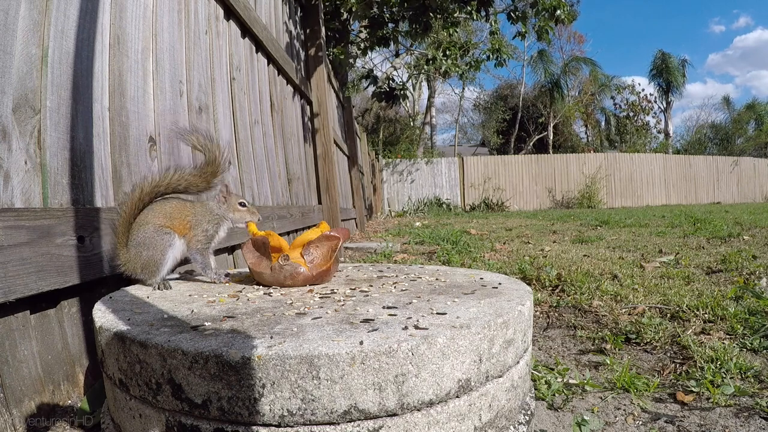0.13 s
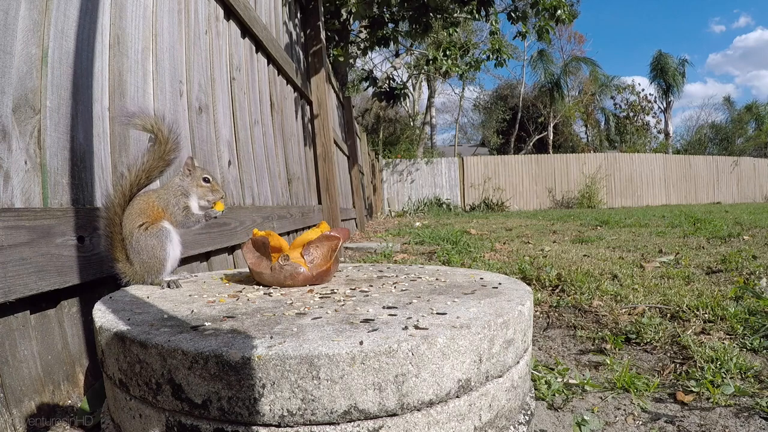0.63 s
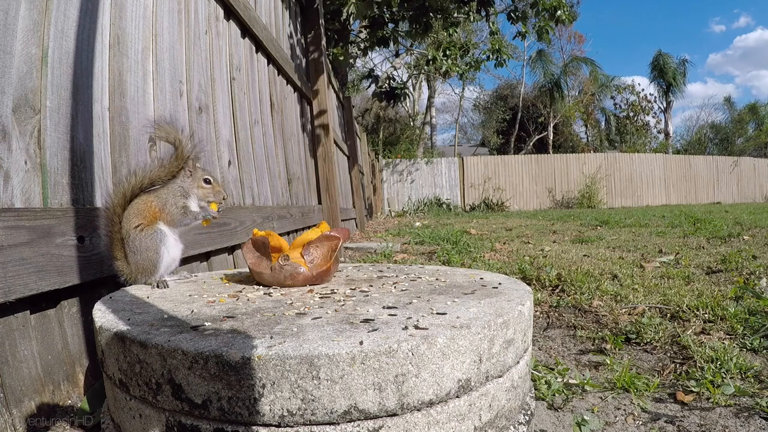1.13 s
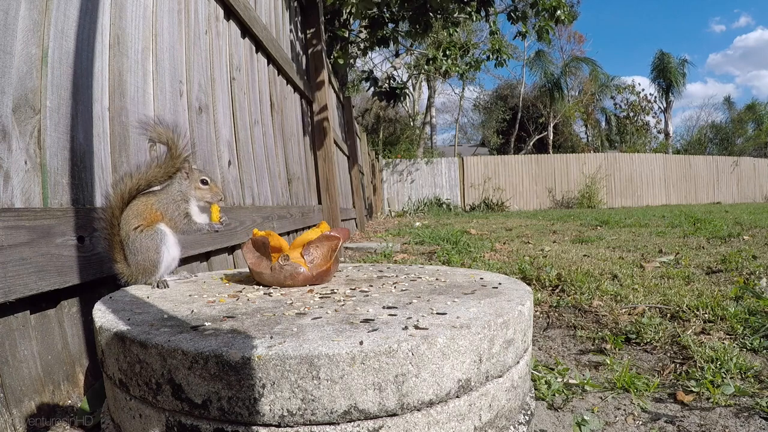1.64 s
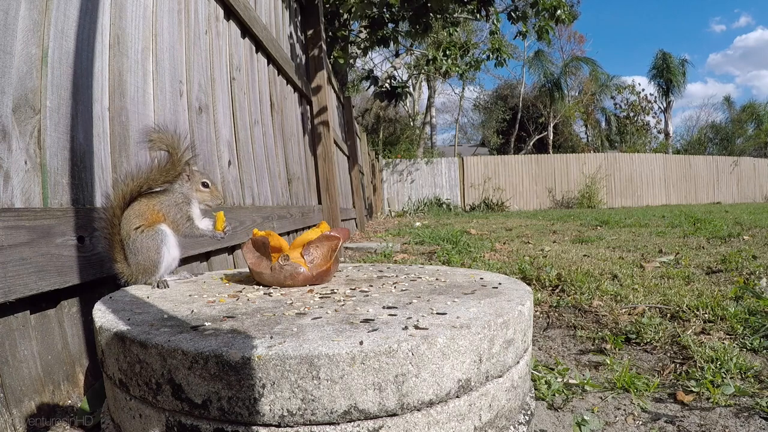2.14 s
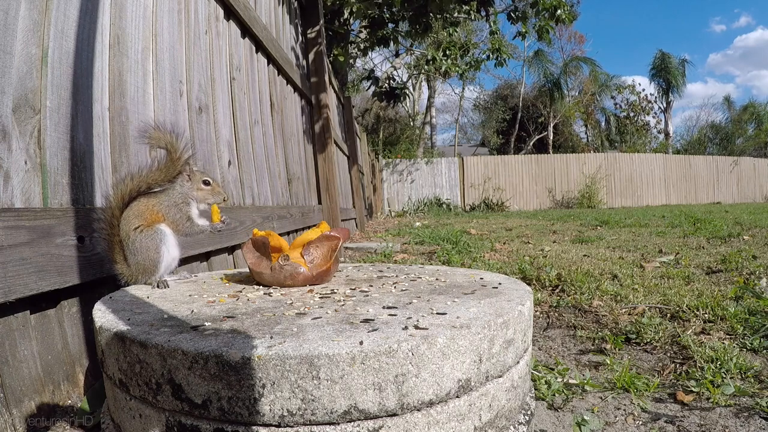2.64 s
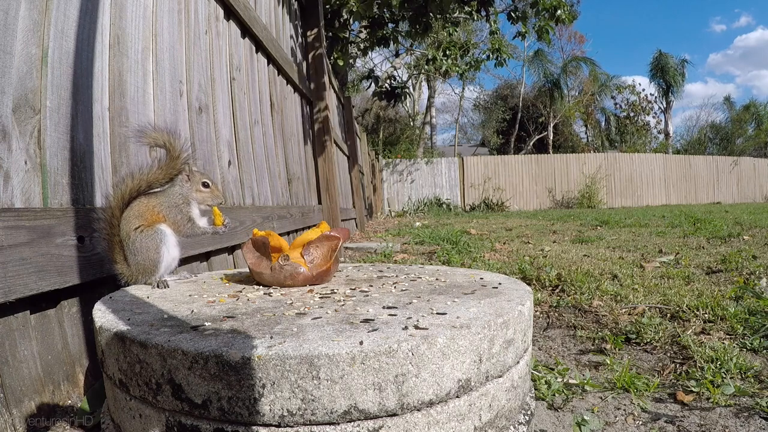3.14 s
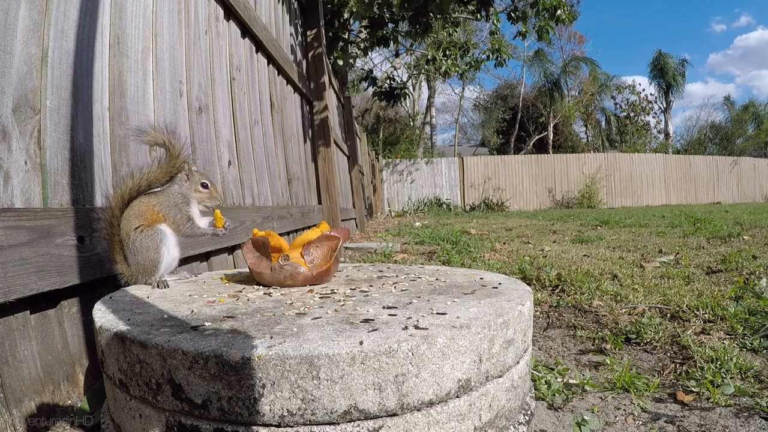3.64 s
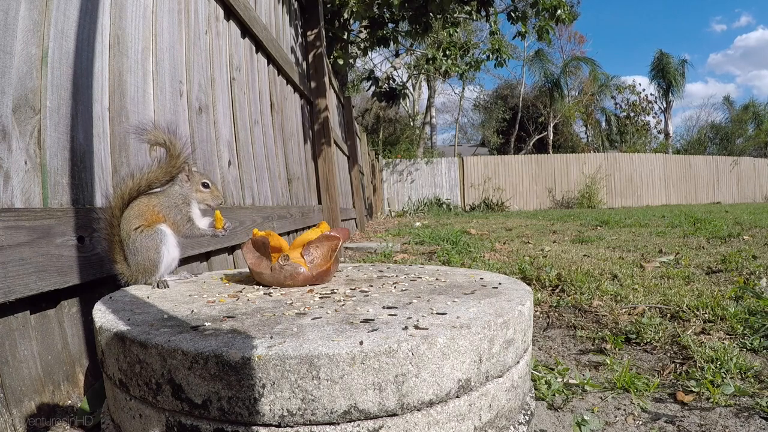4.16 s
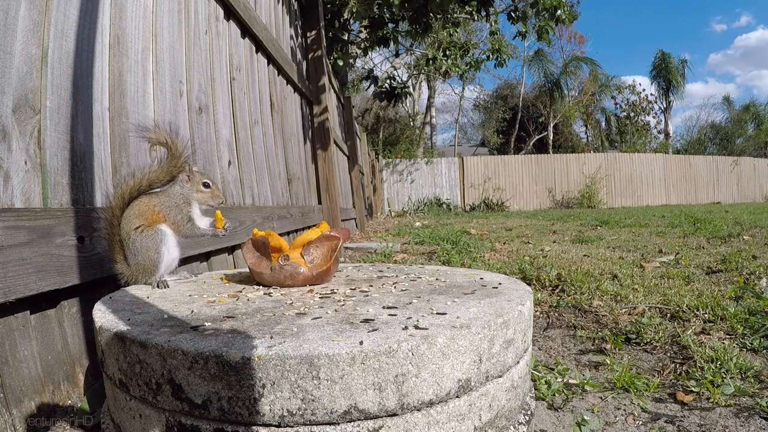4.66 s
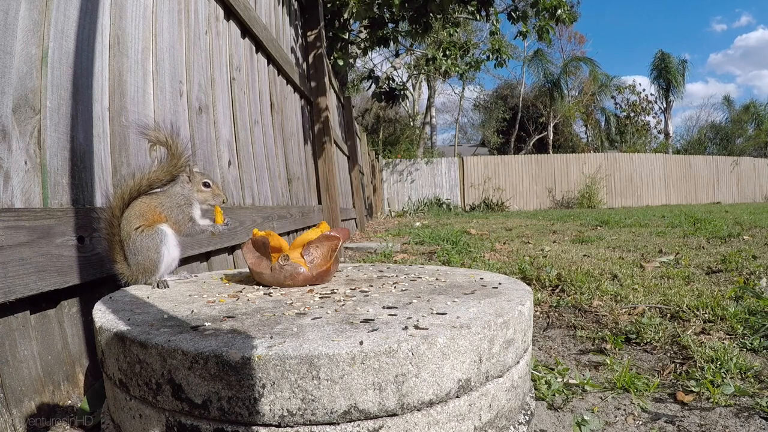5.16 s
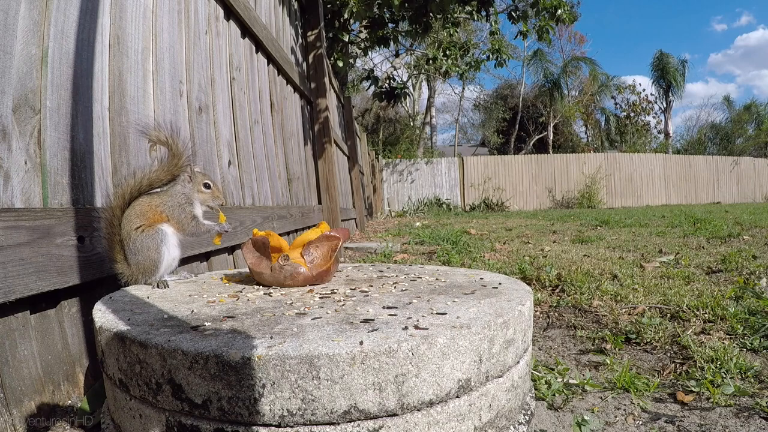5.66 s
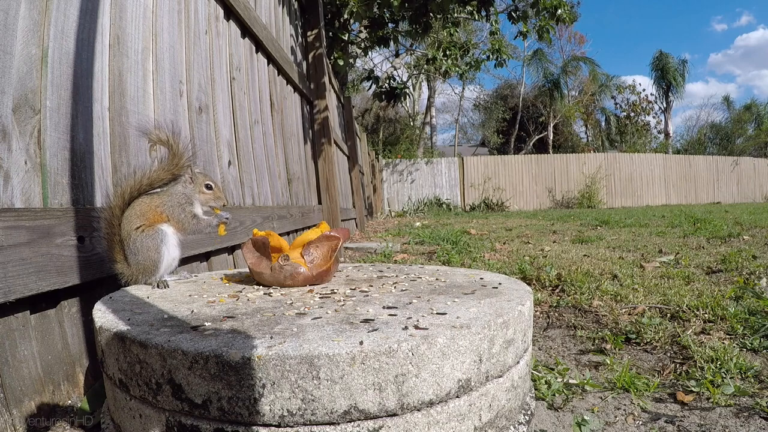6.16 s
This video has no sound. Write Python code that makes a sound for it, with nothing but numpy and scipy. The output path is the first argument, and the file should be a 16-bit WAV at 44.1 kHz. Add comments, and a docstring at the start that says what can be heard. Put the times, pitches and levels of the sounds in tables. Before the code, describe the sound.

Bright bird calls over soft leafy air, faint close nibbling, then a gust thumps the microphone and lets in a deep, slowly fading rumble.

```python
"""Fenced yard with birds, squirrel and gust

Small birds chirp and trill as throbbing or gliding near-sines, the faint notes rougher and richer in echo.
A squirrel nibbles close to the camera microphone: dry ticks over patchy rustle. Steady lines hum and a slow
engine throbs far off as wavering orders. A gust of shaped noise and low thumps knocks the microphone;
its low cut opens then, lets the deep rumble through and closes again over some seconds."""
import sys
import numpy as np
from scipy import signal
from scipy.io import wavfile
from scipy.ndimage import uniform_filter1d

SR = 44100
rng = np.random.default_rng(int(sys.argv[2]) if len(sys.argv) > 2 else 0)


def store_pcm(level_fs):
    """Save levels as 16-bit WAV."""
    pcm = np.round(np.clip(level_fs, -1, 1) * 32767).astype(np.int16)
    wavfile.write(sys.argv[1], SR, np.atleast_2d(pcm).T)


def natural_amplitude(level_db):
    """Convert a level in decibels to a linear amplitude factor, elementwise."""
    exponent = np.asarray(level_db, float) / 20
    return 10 ** exponent


N = 277389

SWELL_PEAK = 0.426  # gliding notes and trills are strongest at this share of their length


def evened(x):
    """Scales to rms 1."""
    return x / np.sqrt(np.mean(x ** 2) + 1e-20)


def read(points, hz):
    """Value of a spectrum on a log-frequency axis."""
    f, value = np.transpose(points)
    return np.interp(np.log(hz + 1), np.log(f + 1), value)


def curve(rows):
    """A table of (s, value) at every sample."""
    return np.interp(np.arange(N) / SR, *np.transpose(rows))


def add(mix, s, sound):
    """Mixes a sound in from time s."""
    part = mix[max(round(s * SR), 0):][:len(sound)]
    part += sound[:len(part)]


def wander(top_hz):
    """Slow drift of rms 1: twelve sines of random phase, the slower the stronger."""
    hz = np.geomspace(top_hz / 20, top_hz, 12)
    t = np.arange(0, N + 256, 256) / SR
    sines = np.sin(2 * np.pi * (hz * t[:, None] + rng.random(12)))
    slow = (sines / np.sqrt(hz)).sum(1)
    return np.interp(np.arange(N) / SR, t, evened(slow))


def noise(gain_db, patchy_db, size):
    """Random short-time spectra of the colour gain_db(hz), with drifting patches."""
    hz = np.fft.rfftfreq(size, 1 / SR)
    a, b, patches = rng.standard_normal((N * 4 // size + 5, len(hz), 3)).T
    patches = uniform_filter1d(patches, size // 64, 0)  # across frequency
    patches = evened(uniform_filter1d(patches, 8192 // size, 1))  # along time
    z = (a + 1j * b) * natural_amplitude(gain_db(hz)[:, None] + patchy_db * patches)
    return signal.istft(z, nperseg=size, noverlap=size * 3 // 4)[1][:N]


def tone(rows, rough, throb=0., crest=0., slur_hz=0.):
    """A near sine along (s, Hz, dB), fluttering in strength and pitch; a throb makes puffs that slur upward."""
    s, hz, db = np.transpose(rows)
    t = np.arange(s[0], s[-1], 1 / SR)
    beat = 2 * np.pi * throb * (t - crest)
    flutter, waver = (evened(uniform_filter1d(row, 180)) for row in rng.standard_normal((2, len(t))))
    pitch = uniform_filter1d(np.interp(t, s, hz), 120, mode="nearest")
    pitch = pitch * (1 + .04 * rough * waver) + slur_hz * np.sin(beat)
    puffs = (1 + rough * flutter) * (1 + .7 * np.cos(beat) * (throb > 0))
    wave = np.sin(2 * np.pi * (np.cumsum(pitch) / SR + rng.random()))
    ends = signal.windows.tukey(len(t), min(.007 * SR / len(t), 1))  # 3.5 ms fades, if the note is long enough
    return t, np.sqrt(2) * natural_amplitude(np.interp(t, s, db)) * puffs * wave * ends


def air():
    """Leaves, distant traffic and microphone hiss as mid and side noise; the sides part only at the top."""
    # Each row: frequency in Hz, density in dB per Hz (relative)
    air_colour = [(150, -53), (250, 3), (312, -11), (340, 1.5), (541, -4.5), (724, -8), (845, -9.5),
                  (2210, -17), (2570, -14), (2850, -16), (3750, -22.5), (4160, -23), (6500, -25),
                  (10700, -25), (11300, -30.5), (13500, -33.5), (15100, -40.5)]
    # Each row: frequency in Hz, side relative to mid in dB
    apart = [(1000, -60), (11300, -58), (11900, -4.5), (13000, -1.5), (15000, 0)]
    start_db, db_per_s = -51, -0.16
    mid = noise(lambda hz: read(air_colour, hz), patchy_db=0.29, size=1024)
    side = noise(lambda hz: read(air_colour, hz) + read(apart, hz), patchy_db=0.0, size=1024)
    level = natural_amplitude(start_db + db_per_s * np.arange(N) / SR) / np.sqrt(np.mean(mid ** 2))
    return level * mid, level * side


def hooks():
    """Calls that drop fast in pitch, level out and die away."""
    # Each row: start in seconds, length in seconds, level in dB, from Hz, to Hz
    hook_calls = [(0, 0.13, -58.5, 2190, 2060), (.742, .048, -54.5, 2640, 2034),
                  (5.215, .04, -51, 2650, 2026), (5.903, 0.074, -51.5, 2700, 2050),
                  (6.013, 0.085, -55.5, 2600, 2390), (6.175, .065, -53.5, 2220, 2205)]
    settle_s, peak_s = 0.01306, 0.022
    rise_db, fade_db = -7, -15.5  # at the start and at the end
    u = np.linspace(0, 1, 32)
    for s, length, db, from_hz, to_hz in hook_calls:
        t = u * length
        hz = to_hz + (from_hz - to_hz) * np.exp(-t / settle_s)
        shape_db = np.interp(t, [0, peak_s, length], [rise_db, 0, fade_db])
        yield np.c_[s + t, hz, db + shape_db], 0, 0, 0


def swell(u):
    """Level in dB of a note over its length u = 0..1, rising to 0 and falling again."""
    depth_db = -12.5
    return depth_db * np.where(u < SWELL_PEAK, 1 - u / SWELL_PEAK, (u - SWELL_PEAK) / (1 - SWELL_PEAK)) ** 2


def glides():
    """Swelling notes and the yard's echoes of louder calls, one glide each, quick then easing into its end."""
    # Each row: start in seconds, length in seconds, level in dB, from Hz, to Hz
    glide_rows = [(.212, 0.07, -65, 2040, 2160), (.240, .036, -57, 3420, 3830),
                  (0.271, 0.032, -57, 3480, 2930), (.326, 0.027, -57, 2120, 2270),
                  (.368, 0.038, -57, 2410, 2190), (0.396, .042, -57, 2134, 1970),
                  (.470, 0.046, -66, 2100, 2150), (0.511, .02, -62, 2410, 2470),
                  (.596, .03, -64, 4050, 4180), (0.623, 0.017, -58, 3920, 3330),
                  (.688, .022, -64, 4280, 3900), (0.672, .03, -61, 2150, 2270),
                  (.780, .026, -59, 2090, 2200), (0.939, .022, -57, 3860, 3960),
                  (0.97, 0.022, -64, 3420, 3290), (1.005, .022, -60, 2300, 2320),
                  (1.018, .03, -66, 3900, 3900), (1.055, 0.024, -59, 2400, 2440),
                  (1.108, 0.027, -68, 3330, 3180), (1.630, 0.019, -61, 2600, 2650),
                  (2.619, .065, -66, 2700, 2530), (3.024, 0.036, -66, 2560, 2590),
                  (3.577, 0.033, -62, 2070, 2220), (3.695, 0.034, -62, 2190, 2500),
                  (3.808, 0.026, -62, 3390, 3370), (3.850, 0.11, -65, 2800, 2870),
                  (3.929, 0.076, -66, 2900, 2610), (4.035, .06, -66, 2740, 2680),
                  (4.200, 0.054, -58, 2470, 2420), (4.282, 0.016, -60, 2500, 2410),
                  (4.445, .045, -61.5, 2800, 2860), (4.503, .05, -62, 2720, 2790),
                  (4.563, .04, -59, 2530, 2750), (4.874, 0.027, -50, 3430, 3150),
                  (4.922, 0.04, -60, 2500, 3000), (5.022, .03, -62, 2500, 2515),
                  (5.046, 0.033, -64, 2820, 2750), (5.308, 0.028, -58, 2370, 2500),
                  (5.827, 0.045, -61, 2610, 2575), (5.241, 0.031, -59, 2080, 2500),
                  (5.860, 0.039, -63, 3100, 2770), (6.018, .032, -67, 2070, 2190),
                  (6.264, .025, -64, 2160, 2210)]
    ease = 1.59  # exponent of the glide
    u = np.linspace(0, 1, 32)
    for s, length, db, from_hz, to_hz in glide_rows:
        hz = to_hz + (from_hz - to_hz) * (1 - u) ** ease
        yield np.c_[s + u * length, hz, db + swell(u)], 0, 0, 0


def song():
    """One bird's upward call, about three a second: it holds low, leaps up and settles, drifts and fades."""
    # Each row: start in seconds, length in seconds, level in dB, from Hz, top Hz, end Hz
    calls = [(1.54, 0.055, -49.5, 2160, 2740, 2500), (1.869, 0.057, -50, 2100, 2700, 2410),
             (2.201, 0.085, -55, 2000, 2720, 2470), (2.488, 0.093, -50.5, 2044, 2745, 2805),
             (2.842, 0.083, -51, 1910, 2600, 2630), (3.18, 0.12, -54, 2170, 2636, 2750)]
    leap_s, leap_width_s = 0.00697, 0.01105
    attack_s, fade_db = 0.0066, -13
    accent_db = 2  # the low start is pushed harder than the top
    break_s, break_width_s, break_db = .019, .005, -8  # the voice weakens briefly during the leap
    u = np.linspace(0, 1, 32)
    for s, length, db, from_hz, top_hz, end_hz in calls:
        t = u * length
        leap = 1 - np.exp(-np.maximum(t - leap_s, 0) / leap_width_s)
        hz = from_hz + (top_hz - from_hz) * leap + (end_hz - top_hz) * u ** 2
        attack_db = -20 * np.maximum(1 - t / attack_s, 0)
        dip_db = break_db * np.exp(-((t - break_s) / break_width_s) ** 2)
        shape_db = attack_db + fade_db * u + accent_db * (1 - leap) + dip_db
        yield np.c_[s + t, hz, db + shape_db], 0, 0, 0


def arches():
    """Notes that bend up and back, weaker at the top than on the way."""
    # Each row: start in seconds, length in seconds, level in dB, Hz at the ends, top Hz
    arch_notes = [(3.615, .052, -52.5, 1716, 2505)]
    top_db = -4.5
    u = np.linspace(0, 1, 32)
    for s, length, db, ends_hz, top_hz in arch_notes:
        bend = np.sin(np.pi * u)
        hz = ends_hz + (top_hz - ends_hz) * bend
        yield np.c_[s + u * length, hz, db + top_db * bend ** 2], 0, 0, 0


def trills():
    """Notes throbbing in fast puffs of air, swelling less deeply than the glides."""
    # Each row: start in seconds, length in seconds, level in dB, Hz, throbs per second, slur in Hz
    trilled_notes = [(4.215, 0.056, -55.5, 2150, 58, 140), (4.382, 0.034, -53, 3270, 87, 120),
                     (4.733, 0.065, -53, 2140, 58, 90), (4.972, .056, -58, 3000, 95, 50)]
    u = np.linspace(0, 1, 32)
    for s, length, db, hz, rate, slur_hz in trilled_notes:
        rows = np.c_[s + u * length, hz + 0 * u, db + 0.76 * swell(u)]
        yield rows, rate, s + SWELL_PEAK * length, slur_hz


def yard(x):
    """Sparse echoes, each band dying at its own speed; a far wall sends back a cluster of them."""
    # Each row: frequency in Hz, time to fall by 60 dB in seconds
    yard_decay = [(1500, 1), (3000, 0.36), (6000, 1)]
    taps = np.zeros(SR)
    at = np.arange(160, SR - 40, 40)
    taps[at + rng.integers(0, 40, len(at))] = rng.choice([-1., 1.], len(at))
    hz, t, z = signal.stft(taps, SR, nperseg=256)
    wall_db = 6 * np.exp(-((t - .078) / .012) ** 2)
    decay_db = -60 * t / read(yard_decay, hz)[:, None]
    tail = signal.istft(z * natural_amplitude(wall_db + decay_db), SR, nperseg=256)[1]
    return signal.fftconvolve(x, tail / np.linalg.norm(tail))[:N]


def birds():
    """All calls and their echoes; the faint ones count as far, so they are rougher and richer in echo."""
    direct, echoed = np.zeros((2, N))
    for kind in (hooks, glides, song, arches, trills):
        for rows, rate, crest, slur_hz in kind():
            far = np.clip((-52 - np.max(rows, 0)[2]) / 14, 0, 1)  # 0 near, 1 far
            t, note = tone(rows, rough=.27 + .18 * far, throb=rate, crest=crest, slur_hz=slur_hz)
            add(direct, t[0], note)
            add(echoed, t[0], natural_amplitude(-4 + 3 * far) * note)
    return direct + yard(echoed)


def engine():
    """A slow far engine: multiples of its cycle rate, each wavering in level on its own."""
    # Each row: time in seconds, cycles per second
    engine_speed = [(0, 16.25), (2.5, 14.37), (4.3, 16.7), (5, 15.65), (6.29, 16.3)]
    # Each row: time in seconds, level in dB common to all orders
    engine_level = [(0, -53), (.7, -55), (1, -63), (1.8, -54), (2.2, -45), (2.6, -47), (3.2, -53),
                    (3.4, -45), (3.8, -45.5), (4.1, -47.5), (4.4, -55), (4.8, -47.5), (5.2, -49.5),
                    (5.5, -51), (6.29, -51.5)]
    # Each row: multiple of the cycle rate, relative level in dB
    engine_orders = [(2, -2.5), (3, -7.5), (5, -23), (6, -17), (7, -1.5), (8, -5), (9, 1.5), (10, -13),
                     (11, -1.5), (12, -8), (13, -2.5), (14, -7.5), (15, -12.5), (16, -12), (17, -17),
                     (18, -14)]
    turns = np.cumsum(curve(engine_speed) * (1 + 0.004035 * wander(top_hz=1.5))) / SR
    orders = sum(natural_amplitude(db + 2.5 * wander(top_hz=8)) * np.sin(2 * np.pi * (k * turns + rng.random()))
                 for k, db in engine_orders)
    return np.sqrt(2) * natural_amplitude(curve(engine_level)) * orders


def hum():
    """Steady lines, wavering a little in level; the upper low one is near engine order 4, and the two beat."""
    # Each row: frequency in Hz, level in dB rms ahead of the low cut
    hum_lines = [(58.5, -38.5), (62.27, -47), (6008, -85), (11148, -96)]
    t = np.arange(N) / SR
    return np.sqrt(2) * sum(natural_amplitude(db + 1.1 * wander(top_hz=5.9)) * np.sin(2 * np.pi * hz * t)
                            for hz, db in hum_lines)


def rumble():
    """Lumpy low noise of wind and traffic, as it is ahead of the low cut."""
    # Each row: frequency in Hz, density in dB per Hz (relative)
    rumble_colour = [(8, -18), (20, 3), (40, -5.5), (80, 13.5), (120, 3), (170, 3.5), (230, -1), (320, -10),
                     (600, -41), (1500, -90)]
    # Each row: time in seconds, rumble level in dB
    low_levels = [(0, -40), (2.33, -44.5), (2.54, -36.5), (2.86, -42.5), (3.17, -40), (3.36, -49.5),
                  (3.56, -39.5), (4.05, -40.5), (4.64, -42), (5.03, -36.5), (5.35, -50), (5.78, -40.5),
                  (6.29, -38)]
    return natural_amplitude(curve(low_levels)) * evened(noise(lambda hz: read(rumble_colour, hz), patchy_db=0.5, size=2048))


def rustle():
    """Patchy hiss of leaves and fur close by, slowly calming, with brief swells."""
    # Each row: frequency in Hz, density in dB per Hz (relative)
    rustle_colour = [(2800, -34), (3700, -1), (4300, 2), (5200, -4), (6200, 0), (7500, -4.5), (9000, -16),
                     (14000, -40)]
    # Each row: peak time in seconds, level in dB, rise in seconds, fall in seconds (time constants)
    shuffles = [(.22, -60, 0.048, .08), (1.795, -57, .02, 0.066)]
    start_db, db_per_s = -61, -0.72
    hiss = noise(lambda hz: read(rustle_colour, hz), patchy_db=1.0, size=256)
    t = np.arange(N) / SR
    power = natural_amplitude(start_db + db_per_s * t) ** 2
    for s, db, rise, fall in shuffles:
        power = power + natural_amplitude(db) ** 2 * np.exp(-2 * np.maximum((s - t) / rise, (t - s) / fall))
    return np.sqrt(power) * evened(hiss)


def nibbles():
    """Teeth on the rind: short dry ticks of noise and a sine, dying at 60 dB in 12 ms."""
    # Each row: start in seconds, level in dB, frequency of the sine in Hz
    bites = [(.2125, -50, 4500), (.4295, -48, 5930), (.737, -50, 5870), (1.348, -51, 6270),
             (3.76, -44.5, 4600), (4.3665, -48, 3210), (4.8485, -48, 4570), (5.0325, -46, 7330),
             (5.867, -49, 3030), (5.9655, -49, 4640)]
    out, t = np.zeros(N), np.arange(200) / SR
    for s, db, hz in bites:
        grit = 1.6 * uniform_filter1d(rng.standard_normal(len(t)), size=3)
        crack = grit + .6 * np.sin(2 * np.pi * hz * t)
        add(out, s, natural_amplitude(db - 60 * t / .012) * crack)
    return out


def thumps():
    """Wind puffs on the microphone and chance lumps of the low noise: a few low cycles under a smooth hump."""
    # Each row: time in seconds (the thump starts 2 ms sooner), peak in dB ahead of the low cut,
    # frequency in Hz, length in cycles
    thump_rows = [(0.798, -35, 165, 4.6), (1.095, -31, 163, 2.5), (1.59, -33.5, 180, 5.1),
                  (2.325, -29.5, 170, 2.5), (2.416, -29, 340, 4.5), (2.448, -27, 184, 7),
                  (2.499, -29, 230, 4.5), (2.608, -25.5, 195, 2.44), (2.658, -29, 190, 2.5),
                  (2.697, -22.5, 194, 2.4), (2.734, -32, 197, 2.6), (3.579, -28.5, 165, 4.14),
                  (3.68, -31, 158, 3.1), (3.807, -36, 200, 3.3), (4.003, -38, 215, 4),
                  (5.363, -32.5, 149, 7.2), (5.854, -33.5, 140, 3.1), (5.94, -28.5, 159, 6)]
    out = np.zeros(N)
    for s, db, hz, cycles in thump_rows:
        t = np.arange(round(max(cycles, 1) / hz * SR)) / SR
        add(out, s - .002, natural_amplitude(db) * np.hanning(len(t)) * np.cos(2 * np.pi * hz * (t - t.mean())))
    return out


def roar():
    """The brighter part of the gust: patchy noise around 330 Hz that rises fast and falls more slowly."""
    peak_s, peak_db = 2.414, -43.5
    rise_db_per_s, fall_db_per_s = 80, 36
    t = np.arange(N) / SR
    hiss = evened(noise(lambda hz: -12 * ((hz - 330) / 130) ** 2, patchy_db=5.5, size=1024))
    return natural_amplitude(peak_db - np.maximum(rise_db_per_s * (peak_s - t), fall_db_per_s * (t - peak_s))) * hiss


def knock():
    """The gust knocks the microphone: a swelling ring that stops short, bent by an uneven membrane."""
    # Each row: time in seconds, frequency in Hz, level in dB ahead of the low cut
    knock_path = [(2.355, 170, -42), (2.372, 195, -34), (2.381, 250, -24.5), (2.388, 238, -25),
                  (2.394, 160, -26), (2.4, 167, -18), (2.407, 190, -37)]
    out = np.zeros(N)
    t, ring = tone(knock_path, rough=0.023)
    bent = 2.0 * ring ** 2
    riding_air = 0.58 * abs(ring) * rng.standard_normal(len(t))
    band = signal.butter(3, [300, 750], "bandpass", fs=SR, output="sos")
    add(out, t[0], ring + signal.sosfilt(band, bent + riding_air))
    return out


def scene():
    """Everything reaches both channels alike, but for the hiss at the very top."""
    mid, side = air()
    low_drone = engine() + hum()
    squirrel = rustle() + nibbles()
    wind = rumble() + thumps() + roar() + knock()
    mid = mid + birds() + low_drone + squirrel + wind
    return np.array([mid + side, mid - side])


def cut_depth_db(t):
    """Low cut deep in calm air, slowly easing; opens as the knock comes, then closes ever more slowly."""
    rest_db, sag_db_per_s = 35, 3
    opens_s, opening_s, open_db = 2.37, 0.14, -1.5  # opening_s and closing_s are time constants
    closes_s, closing_s, closed_db = 3.08, 2.4, 38.5
    rest = rest_db - sag_db_per_s * np.minimum(t, opens_s)
    opened = open_db + (rest - open_db) * np.exp(-np.maximum(t - opens_s, 0) / opening_s)
    closed = 1 - np.exp(-np.maximum(t - closes_s, 0) / closing_s)
    return opened + (closed_db - opened) * closed


def low_pass(x):
    """Removes everything above the highest recorded frequency."""
    return signal.sosfilt(signal.butter(12, 15210, fs=SR, output="sos"), x)


def record(dry):
    """The microphone's low cut of changing depth and its band limit at 15250 Hz."""
    # Each row: frequency in Hz, share of the cut's depth
    cut_shape = [(10, 0.96), (60, 1.005), (100, 1.06), (120, 1.03), (135, 0.039), (150, 0.0012)]
    hz, t, z = signal.stft(dry, SR, nperseg=4096, noverlap=3072)
    low_cut = natural_amplitude(-read(cut_shape, hz)[:, None] * cut_depth_db(t))
    z = z * low_cut * (hz < 15250)[:, None]
    cut = signal.istft(z, SR, nperseg=4096, noverlap=3072)[1]
    return low_pass(cut[:, :N])


dry = scene()
out = record(dry)
store_pcm(out)
```